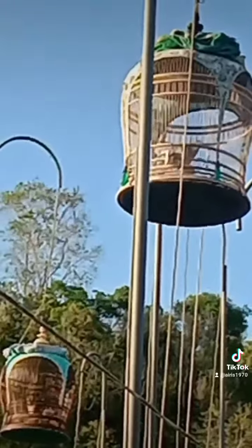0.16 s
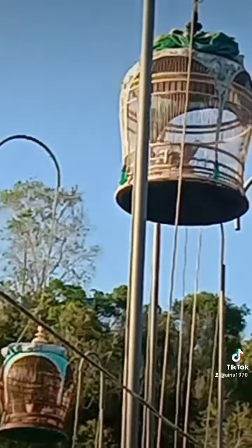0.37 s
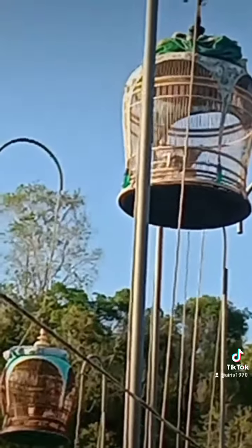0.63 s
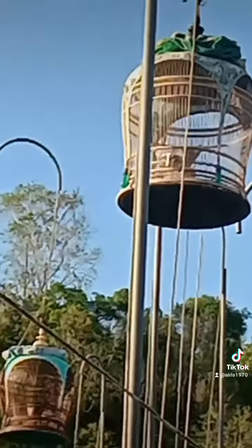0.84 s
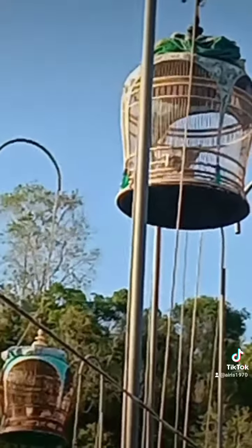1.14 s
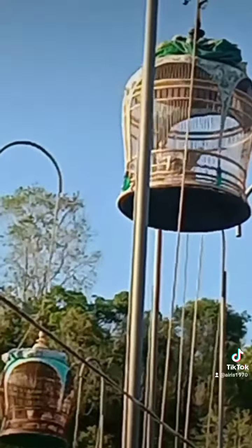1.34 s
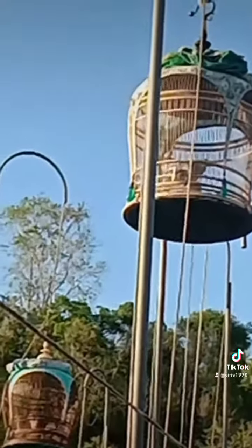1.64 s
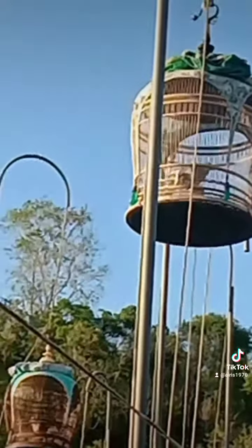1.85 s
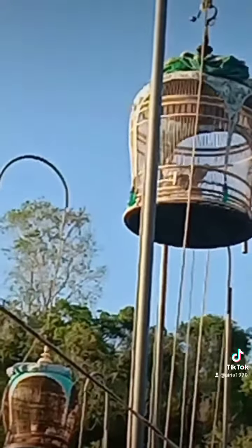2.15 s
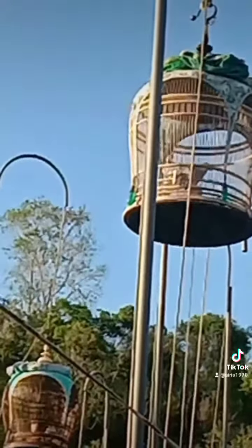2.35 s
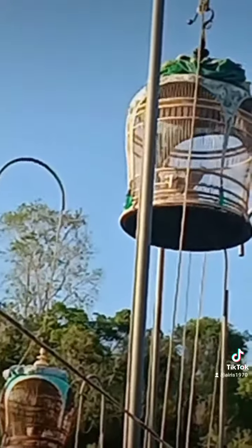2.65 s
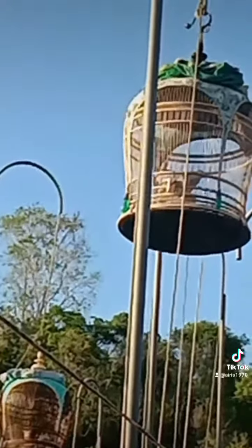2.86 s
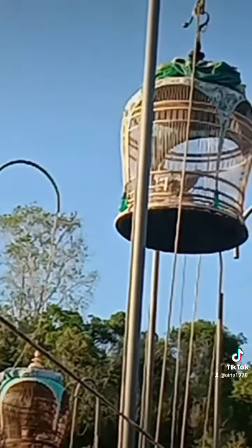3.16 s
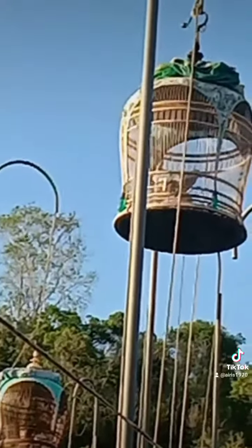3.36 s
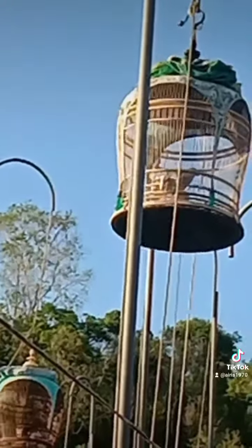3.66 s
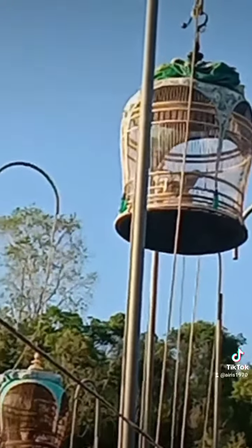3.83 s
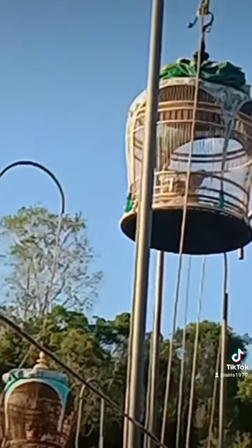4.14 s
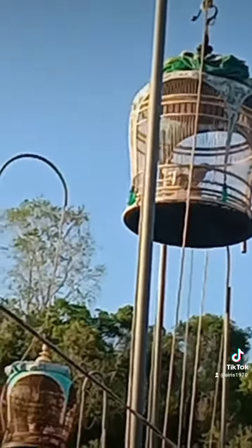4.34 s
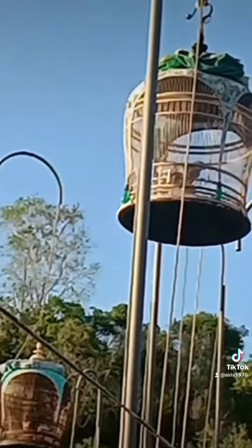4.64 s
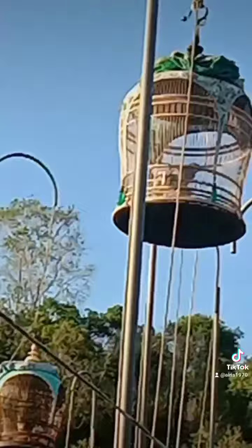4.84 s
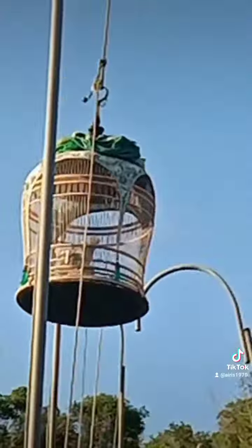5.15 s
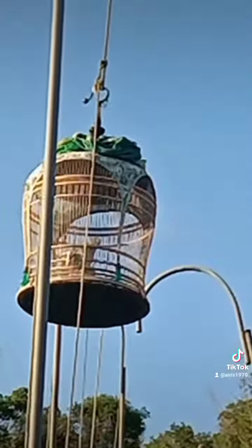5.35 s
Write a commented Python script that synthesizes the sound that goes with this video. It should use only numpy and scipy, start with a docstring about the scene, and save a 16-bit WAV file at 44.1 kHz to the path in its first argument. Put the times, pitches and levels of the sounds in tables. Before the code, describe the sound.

Outdoors, a dove's repeated hoots stretch into one long coo, answered by a sharp rolling dove call, over bird whistles, insects and gritty footsteps.

```python
"""An open yard with caged doves: one coos ever longer notes, a neighbour drones under it, a zebra dove cuts in high.
Small birds whistle, chirp and trill in the trees: near-pure gliding tones, some roughened by noise or a beat.
Four insects buzz as pulsed noise through a resonance; feet scuff the ground close by in hiss, thuds and ticks.
Walls and trees return soft echoes and a diffuse tail; a phone microphone colours the mono sum."""
import sys
import numpy as np
from scipy import signal
from scipy.fft import rfft, irfft
from scipy.io import wavfile
from scipy.ndimage import uniform_filter1d

SR = 44100
rng = np.random.default_rng(int(sys.argv[2]) if len(sys.argv) > 2 else 0)


def to_wav(sig):
    """Store sig (one row per channel, or 1-D mono) as 16-bit WAV at the path in sys.argv[1].

    Samples outside -1..1 are clipped; the rate is SR.
    """
    pcm = np.clip(np.atleast_2d(sig), -1, 1) * 32767
    pcm = np.round(pcm).astype(np.int16)
    wavfile.write(sys.argv[1], SR, pcm.T)  # frames by channels


def attenuation_scalar(level_db):
    """Turn a level in dB into a linear amplitude multiplier (20 dB per decade)."""
    decades = np.asarray(level_db, float) / 20
    return 10 ** decades


N = 242550
T = np.arange(N) / SR


def unit(x):
    """Scale to rms 1."""
    return x / np.sqrt(np.mean(x ** 2))


def walk(rate_hz):
    """Smooth random curve of rms 1 that changes about rate_hz times a second."""
    knots = uniform_filter1d(rng.standard_normal(int(2 * rate_hz * N / SR) + 2), size=2)
    return unit(np.interp(T * 2 * rate_hz, np.arange(len(knots)), knots))


def band(x, hz, width_hz):
    """Second-order Butterworth band-pass."""
    limits = [hz - width_hz / 2, hz + width_hz / 2]
    return signal.sosfilt(signal.butter(2, limits, "bandpass", fs=SR, output="sos"), x)


def noise_band(hz, width_hz):
    """White noise through one band-pass, rms 1."""
    return unit(band(rng.standard_normal(N), hz, width_hz))


def shape(x, spectrum):
    """Filter by (Hz, dB) points joined on a log-frequency axis."""
    f, db = np.transpose(spectrum)
    hz = np.maximum(np.fft.rfftfreq(N, 1 / SR), 1)
    return irfft(rfft(x) * attenuation_scalar(np.interp(np.log(hz), np.log(f), db)), N)


def coloured(spectrum, flicker_db, rate_hz):
    """Noise in quarter-octave bands that flicker independently, weighted by a spectrum, rms 1."""
    noise = rng.standard_normal(N)
    centres = 40 * 2 ** np.arange(0, 8.6, 1 / 4)
    flat = sum(band(noise, c, c / 6) * attenuation_scalar(flicker_db * walk(rate_hz)) for c in centres)
    return unit(shape(flat, spectrum))


def window(start_s, length_s, edge_s, t=T):
    """A gate of the given length with sine-squared edges."""
    inside = np.minimum(t - start_s, start_s + length_s - t)
    return np.sin(np.pi / 2 * np.clip(inside / edge_s, 0, 1)) ** 2


def knock(events, rise_s, t60_s):
    """Envelope of a row of knocks, each rising fast and dying exponentially."""
    t = T[:SR // 4]
    hits = np.zeros(N)
    hits[[int(s * SR) for s, *_ in events]] = attenuation_scalar([db for _, db, *_ in events])
    return signal.fftconvolve(hits, (1 - np.exp(-t / rise_s)) * attenuation_scalar(-60 * t / t60_s))[:N]


def sing(notes, edge_s, wobble_db=0., rate_hz=40., drift_hz=0.):
    """A near-pure syrinx tone along each note's (s, Hz, dB) points, with random wobble and drift."""
    out, drift = np.zeros(N), drift_hz * walk(rate_hz)
    for note in notes:
        s, hz, db = np.transpose(note)
        part = slice(max(int((s[0] - edge_s) * SR), 0), int((s[-1] + edge_s) * SR))
        t = T[part]
        phase = 2 * np.pi * np.cumsum(np.interp(t, s, hz) + drift[part]) / SR
        gate = window(s[0] - edge_s / 2, s[-1] - s[0] + edge_s, edge_s, t)
        out[part] += np.sqrt(2) * attenuation_scalar(np.interp(t, s, db)) * gate * np.sin(phase)
    return out * attenuation_scalar(wobble_db * walk(rate_hz))


def glides(rows):
    """Straight syrinx glides from rows of start s, length s, from Hz, to Hz, level dB."""
    return sing([[(s, a, db), (s + d, b, db - 0.5)] for s, d, a, b, db in rows], 0.0071)


def flutter():
    """Low-frequency noise, rms 1, that roughens a syrinx tone into a rasp."""
    return unit(band(band(rng.standard_normal(N), 170, 320), 170, 320))


def breath():
    """Slight random gain that makes a tone breathy."""
    return 1 + .3 * noise_band(70, 110)


def yard(x, echoes, tail_db, t60_s):
    """Direct sound, distinct (delay s, dB) echoes and a diffuse tail of decaying noise."""
    t = T[:SR // 2]
    response = attenuation_scalar(tail_db) * rng.standard_normal(len(t)) * attenuation_scalar(-60 * t / t60_s) * (t > .012)
    response[0] = 1
    for delay_s, db in echoes:
        response[int(delay_s * SR)] += attenuation_scalar(db)
    return signal.fftconvolve(x, response)[:N]


def strokes(hz, width_hz, rate_hz, share):
    """Wing or membrane strokes, a puff of noise each, through the insect's resonance; rms 1."""
    puffs = np.exp(-((rate_hz * T % 1 - .5) / (share / 2)) ** 2) * rng.standard_normal(N)
    return unit(band(band(puffs, hz, width_hz), hz, width_hz))


def steady_buzzer():
    """Continuous wing strokes heard in two bands."""
    # Each row: centre in Hz, width in Hz, share of the stroke that sounds, mean level in dB.
    bands = [(10570, 1620, 1, -76), (14200, 4100, 0.82, -84)]
    wing_hz = 136.2
    return sum(attenuation_scalar(db + 1.2 * walk(18)) * strokes(hz, w, wing_hz, share) for hz, w, share, db in bands)


def throbbers():
    """Two insects with slow strokes, each throb a swell of narrow-band noise."""
    # Each row: centre in Hz, width in Hz, throbs a second, share that sounds, mean level in dB.
    throbs = [(4870, 260, 29, 0.71, -86), (1153, 64, 7.5, 0.93, -76.5)]
    return sum(attenuation_scalar(db + walk(1.0)) * strokes(hz, w, r, share) for hz, w, r, share, db in throbs)


def cicada():
    """Membrane strokes in phrases that swell by 14 dB and stop short."""
    # Each row: start in seconds, end in seconds, level reached at the end in dB.
    phrases = [(-.4, 0.53, -70.5), (0.924, 1.629, -69.5), (2.05, 2.652, -72.5), (2.993, 3.633, -68),
               (3.202, 3.76, -80), (3.956, 4.656, -70.5), (4.21, 4.923, -80.5), (5.1, 5.25, -80)]
    envelope = sum(attenuation_scalar(db - 14 * (b - T) / (b - a)) * window(a, b - a, 0.027) for a, b, db in phrases)
    return envelope * strokes(7097, 530, 182, 0.72)


def outdoor_air():
    """Coloured noise that swells gently and flickers band by band."""
    # Each row: frequency in Hz, relative level in dB per Hz.
    air_spectrum = [(30, -24.5), (100, -8), (250, -9.5), (500, -16), (900, -17.5), (1300, -7.5),
                    (1700, -19.5), (2800, -14.5), (4000, -18), (5000, -16.5), (6300, -26.5), (7500, -28.5),
                    (9000, -24)]
    mean_db, swell_db, flicker_db = -71.5, 1.3, 1.7
    return attenuation_scalar(mean_db + swell_db * walk(9)) * coloured(air_spectrum, flicker_db, 12.)


def drone():
    """The neighbour's syrinx tone: pitch sinks steadily, each swell rises and dies."""
    # Each row: start in seconds, end in seconds, peak level in dB.
    swells = [(-.03, 0.035, -50.5), (0.038, 0.121, -53.5), (0.13, 0.197, -47.5), (0.263, 0.375, -50),
              (0.424, 0.556, -47), (0.613, 0.864, -49.5), (0.886, 0.983, -45), (1.011, 1.162, -51.5),
              (1.212, 1.531, -52.5)]
    start_hz, slope_hz_per_s = 691, -36.5
    notes = []
    for a, b, db in swells:
        points = (a, db - 2.0), (a + 0.62 * (b - a), db), (b, db - 9.0)
        notes.append([(s, start_hz + slope_hz_per_s * s, level) for s, level in points])
    return sing(notes, 0.005436, 1.8, 30.14, 11)


def scuffs():
    """Grit hisses and crackles under a dragging sole, fading through each scuff."""
    # Each row: start in seconds, time to fall 16 dB in seconds, starting level in dB.
    drags = [(0, 0.048, -62.5), (0.235, 0.13, -55.5), (0.338, 0.14, -52), (0.824, 0.15, -50.5),
             (0.873, 0.15, -49), (1.082, .17, -50), (1.44, 0.12, -54), (1.693, 0.17, -54.5),
             (2.052, 0.17, -53.5), (2.31, 0.13, -60.5), (3.364, 0.15, -61.5), (3.539, 0.085, -65.5),
             (3.901, 0.19, -62), (4.341, 0.087, -64), (4.566, 0.22, -66)]
    # Each row: frequency in Hz, relative level in dB per Hz.
    grit_spectrum = [(25, -54), (70, -27), (220, -22), (450, -21), (900, -17.5), (1300, -20.5), (2500, -19),
                     (4500, -16.5), (6500, -28), (9000, -35.5)]
    grains_per_s, spread_db, crackle_db, grain_t60_s = 700, 3, -5, 0.023
    drag = sum(attenuation_scalar(db - 16 * (T - s) / d) * window(s, 1.06 * d, 0.28 * d) for s, d, db in drags)
    grains = (rng.random(N) < grains_per_s / SR) * rng.standard_normal(N)
    grains *= attenuation_scalar(spread_db * np.minimum(rng.exponential(size=N), 4))
    ring = rng.standard_normal(SR // 50) * attenuation_scalar(-60 * T[:SR // 50] / grain_t60_s)
    grains = signal.fftconvolve(grains, ring)[:N]
    pink = [(hz, db - 10 * np.log10(hz)) for hz, db in grit_spectrum]  # 3 dB an octave darker
    hiss = coloured(grit_spectrum, 2.93, 40.) * attenuation_scalar(2.0 * walk(110))
    return drag * (hiss + attenuation_scalar(crackle_db) * unit(shape(grains, pink)))


def thuds():
    """Dull ground thuds of the steps: short noise bursts through the pitch of each blow."""
    # Each row: time in seconds, level before the final band-pass in dB, pitch in Hz.
    blows = [(.005, -47, 770), (0.368, -45.5, 743), (0.838, -52, 252), (0.892, -49, 234), (0.995, -56, 175),
             (1.103, -48.5, 125), (1.451, -55, 240), (1.729, -63.5, 208), (1.835, -63.5, 208),
             (2.057, -48.5, 197), (3.135, -63.5, 246), (3.912, -68.5, 198), (4.348, -63.5, 234),
             (4.584, -58, 250), (4.584, -55.5, 463), (4.716, -56, 242)]
    out = np.zeros(N)
    for s, db, hz in blows:
        burst = noise_band(hz, 0.48 * hz) * knock([(s, db)], 0.00057, 0.2)
        out += band(burst, 1.79 * hz, 2.45 * hz)
    return out


def whistler():
    """One bird's wavering syrinx whistles: rising notes, and level notes flicked down at the end."""
    # Each row: start in seconds, end of rise in seconds, starting pitch in Hz, peak level in dB.
    rising = [(0.192, 0.379, 2865, -54), (3.85, 4.005, 2784, -54.5), (5.324, 5.51, 2826, -57.5)]
    # Each row: start in seconds, end in seconds, level ahead of the flick in dB.
    level_notes = [(0.044, 0.105, -72.5), (0.512, 0.724, -59.5), (4.145, 4.363, -68), (5.148, 5.204, -76.5)]
    top_hz, swell_db, linger_s, linger_db = 3240, 13.5, 0.19, 23.5
    held_hz, flick_hz_per_s, flick_s = 2770, 980, 0.036  # the longer the note, the deeper its flick
    notes = []
    for a, b, hz, db in rising:
        notes.append([(a, hz, db - swell_db), (b, top_hz, db), (b + 0.065, top_hz, db - 0.78 * linger_db),
                      (b + linger_s, top_hz - 25, db - linger_db)])
    for a, b, db in level_notes:
        notes.append([(a, held_hz, db - 7), (a + 0.34 * (b - a), held_hz - 25, db - 3.5),
                      (b - flick_s, held_hz + 15, db), (b, held_hz - flick_hz_per_s * (b - a), db + 1.0)])
    return sing(notes, .015, 2.0, 45., 14) * breath()


def coo(a, b, hz, db):
    """Scoop up to the pitch, swell, break off and sag as the breath runs out."""
    scoop_s, scoop_hz, scoop_db = 0.017, 86, 14.5
    sag_s, sag_hz, sag_db = .02, 52, 14
    return [(a, hz - scoop_hz, db - scoop_db), (a + scoop_s, hz - 30, db - 10.0),
            (a + min(.05, 0.7 * (b - a)), hz - 6, db - 5), (b - .012, hz, db), (b - .003, hz - 6, db - 4.5),
            (b + 0.0023, hz - 25, db - 8.5), (b + sag_s, hz - sag_hz, db - sag_db)]


def near_dove():
    """Syrinx coos; the throat clucks as each short one opens, fainter along the series."""
    # Each row: start in seconds, break-off in seconds, top pitch in Hz, peak level in dB.
    coos = [(0.214, 0.265, 766, -40), (0.406, 0.455, 758, -39.5), (0.604, 0.658, 763, -40),
            (0.793, 0.853, 774.5, -39), (0.994, 1.06, 767.5, -38.5), (1.197, 1.273, 768.5, -38),
            (1.418, 1.497, 767.4, -39), (1.646, 1.77, 766.5, -38.5), (1.92, 2.08, 756, -39),
            (2.259, 2.404, 753.6, -41.5)]
    # One note; each row: time in seconds, pitch in Hz, level in dB.
    long_coo = [
        [(2.579, 710, -55), (2.61, 734, -48.5), (2.72, 736, -44.5), (3.0, 707.3, -44), (3.25, 691, -45.5),
         (3.42, 703, -49.5), (3.51, 741, -57.5), (3.53, 792, -52.5)],
    ]
    cluck_hz, cluck_db, cluck_db_per_s = 1260, -54, -5
    clucks = []
    for a, *_ in coos:
        db = cluck_db + cluck_db_per_s * a
        clucks.append([(a - .002, cluck_hz - 11, db + 0.5), (a + 0.022, cluck_hz + 11, db)])
    return sing([coo(*c) for c in coos] + long_coo, 0.00593) + sing(clucks, 0.017, 5.7, 150., 30.0)


def ticks():
    """Twigs tick: short noise bursts, each opening with a bright snap."""
    # Each row: time in seconds, level in dB, centre in Hz.
    snaps = [(0.2912, -49, 4670), (0.3716, -49, 1650), (0.843, -41, 6500), (0.896, -40, 3350),
             (0.9263, -43.5, 3740), (1.1006, -45.5, 2600), (1.4619, -38.5, 5000), (1.514, -55, 5300),
             (1.549, -57, 5700), (2.118, -55, 4600), (2.328, -58, 3170), (2.403, -56, 3100),
             (3.5383, -38.5, 6400), (4.351, -60, 5340), (4.591, -55, 3700), (4.717, -62, 1610)]
    noise = rng.standard_normal(N)
    body = sum(unit(band(noise, hz, 3100)) * knock([(s, db)], 0.0006, 0.025) for s, db, hz in snaps)
    return body + attenuation_scalar(-11.5) * unit(band(noise, 9150, 8000)) * knock(snaps, 0.00083, 0.011)


def trill():
    """A slow row of short rising syrinx pips that swells by 4 dB."""
    # Each row: first pip in seconds, end in seconds, level reached at the end in dB.
    rows = [(0.46, .85, -61.5), (1.376, 1.81, -61.5), (2.322, 2.73, -62.5), (4.667, 5.038, -71)]
    pips_per_s = 25.4
    pips = []
    for a, b, db in rows:
        for s in np.arange(a, b, 1 / pips_per_s):
            level = db - 4 * (b - s) / (b - a)
            pips.append([(s, 2440, level + 0.5), (s + 0.011, 2580, level)])
    return sing(pips, 0.008, 1.6, 25., 18)


def buzzing_notes():
    """A close bird's fluttering syrinx: a steady beat and some chance make the buzz."""
    # Each row: start in seconds, length in seconds, from Hz, to Hz, level before the beat in dB.
    buzzes = [(1.104, 0.059, 5750, 5750, -45), (1.168, 0.05, 5720, 5850, -54),
              (1.128, 0.066, 6630, 6650, -54)]
    beat_hz = 131
    return glides(buzzes) * (.75 + .45 * np.cos(2 * np.pi * beat_hz * T) + .45 * flutter())


def tumbling_call():
    """One bird's call falls through four glides, each rasped by chance, with a short tail of its own."""
    # Each row: start from the call time in seconds, length in seconds, from Hz, to Hz,
    # relative level before the rasp in dB, rasp depth.
    falls = [(-.037, 0.017, 6050, 5850, 0.5, .25), (-.002, .012, 5950, 5500, -2.5, .4),
             (.01, .02, 5150, 4750, -6, 3), (0.036, .018, 3650, 3400, -11, 2.5)]
    # Each row: call time in seconds, level before the rasp in dB.
    calls = [(1.242, -56.5), (2.039, -57), (3.02, -58.5)]
    chance = flutter()
    out = np.zeros(N)
    for dt, d, a, b, rel, rough in falls:
        notes = [[(s + dt, a, db + rel), (s + dt + d, b, db + rel)] for s, db in calls]
        out += sing(notes, 0.0078) * (1 + rough * chance)
    return yard(out, [], -32, 0.11)


def chirps():
    """Short syrinx glides that chance spreads into a rasp."""
    # Each row: start in seconds, length in seconds, from Hz, to Hz, level before the rasp in dB.
    rows = [(1.308, 0.026, 2970, 2890, -62.5), (2.191, 0.0097, 3440, 3400, -58),
            (2.221, 0.011, 2990, 3050, -61), (3.443, 0.04, 2750, 3240, -60),
            (3.669, 0.035, 3190, 2960, -66), (3.873, 0.018, 2930, 3300, -62.5),
            (3.965, 0.025, 2390, 2460, -61.5), (4.5, 0.012, 3900, 3250, -69.5),
            (4.528, 0.019, 2950, 2940, -83), (5.12, 0.026, 3310, 2970, -66),
            (5.329, 0.032, 2540, 2430, -68.5)]
    return glides(rows) * (.8 + .5 * flutter())


def drawls():
    """Drawn-out far calls arrive by many paths and blur into a narrow hiss."""
    # Each row: start in seconds, length in seconds, from Hz, to Hz, level before the blur in dB.
    rows = [(1.347, 0.048, 3780, 4070, -62), (1.385, 0.032, 4300, 4470, -66), (1.578, .13, 3790, 4150, -67),
            (1.626, 0.098, 3170, 3320, -67.5), (1.913, 0.15, 4000, 3850, -66.5),
            (1.87, 0.25, 3150, 3240, -68.5), (2.063, 0.029, 3450, 3770, -69),
            (2.272, 0.14, 3960, 4090, -72.5), (2.918, 0.038, 3430, 3570, -76),
            (2.975, .075, 3850, 4130, -74), (4.315, .15, 4000, 4000, -89)]
    return glides(rows) * (.3 + .65 * noise_band(75, 140)) * breath()


def zebra_dove():
    """A throbbing syrinx note, then arched notes; a fluttering climb leads into each."""
    # First note; each row: start in seconds, length in seconds, pitch in Hz, level in dB.
    pulses = [(2.643, 0.0041, 1244, -31), (2.674, 0.013, 1263, -31.5), (2.715, 0.0024, 1286, -31.5),
              (2.733, 0.005, 1216, -29.5), (2.765, 0.0025, 1233, -33.5), (2.785, 0.019, 1209, -33)]
    # Plain notes; each row: start in seconds, end in seconds, top pitch in Hz, peak level in dB.
    plain = [(2.842, 2.876, 1212, -35), (2.915, 2.945, 1192, -42), (3.005, 3.04, 1206, -36.5),
             (3.122, 3.273, 1230, -32.5)]
    dip_db, dip_hz = 10, 35.6  # between pulses the level dips and the pitch slips up
    rise_hz, fall_hz, fade_db = 45, 126, 14.5
    roll_s, roll_db, roll_from_hz, roll_to_hz = .022, -42.5, 920, 1183
    roll_hz, roll_depth, roll_scatter_db = 105, .65, 2.5
    first_s, _, first_hz, first_db = pulses[0]
    throb = [(first_s - .008, first_hz - 25, first_db - dip_db)]
    for (s, d, hz, db), (after, *_) in zip(pulses, pulses[1:] + [(pulses[-1][0] + 0.044,)]):
        throb += [(s, hz, db), (s + d, hz, db - .6), ((s + d + after) / 2, hz + dip_hz, db - dip_db)]
    notes = [throb]
    for a, b, hz, db in plain:
        d = b - a
        notes.append([(a, hz - rise_hz, db - 5.5), (a + 0.011, hz - 15, db), (a + 0.29 * d, hz, db - 1.0),
                      (a + .65 * d, hz - 0.32 * fall_hz, db - 5.5),
                      (a + .75 * d, hz - 0.71 * fall_hz, db - 0.82 * fade_db), (b, hz - fall_hz, db - fade_db)])
    climbs = [[(n[0][0] - roll_s, roll_from_hz, roll_db - 3.5), (n[0][0] + 0.0022, roll_to_hz, roll_db)]
              for n in notes]
    rolls = sing(climbs, 0.00526) * (1 + roll_depth * np.cos(2 * np.pi * roll_hz * T))
    return sing(notes, .006) + rolls * attenuation_scalar(roll_scatter_db * walk(150))


def far_dove():
    """Distant syrinx calls arrive by many paths and waver."""
    # Each row: start in seconds, end in seconds, starting pitch in Hz, starting level in dB.
    calls = [(3.967, 4.03, 612, -80), (4.008, 4.204, 615, -73.5), (4.232, 4.274, 580, -84),
             (4.441, 4.483, 605, -78.5), (4.654, 4.7, 600, -72), (4.901, 5.125, 590, -78.5)]
    return sing([[(a, hz, db), (b, hz - 6, db - 2.5)] for a, b, hz, db in calls], 0.00735, 1.2, 45)


def whoop():
    """A low syrinx call rising at the close."""
    # One note; each row: time in seconds, pitch in Hz, level in dB.
    rise = [
        [(5.46, 467, -66), (5.48, 530, -61), (5.5, 827, -51)],
    ]
    return sing(rise, 0.0036, 3.0, 220)


def background():
    """Insects and air, sinking together when the doves stop."""
    # Each row: time in seconds, gain in dB.
    swell = [(0.0, 3.5), (3.55, 2.5), (3.61, -2.5), (5.42, -3.5), (5.5, 1)]
    s, db = np.transpose(swell)
    return (steady_buzzer() + throbbers() + cicada() + outdoor_air()) * attenuation_scalar(np.interp(T, s, db))


def scene():
    """Birds through the yard's echoes, over steps, insects, outdoor air and a faint even hiss."""
    # Each row: delay in seconds, level in dB.
    echo_list = [(.045, -19), (.11, -33)]
    near = yard(near_dove() + zebra_dove(), echo_list, -49.5, 0.37)
    far = yard(drone() + far_dove() + whoop(), [], -29.5, 0.31)
    small_birds = whistler() + trill() + buzzing_notes() + tumbling_call() + chirps() + drawls()
    trees = yard(small_birds, [], -34.0, 0.36)
    steps = scuffs() + thuds() + ticks()
    hiss = attenuation_scalar(-93.0) * rng.standard_normal(N)
    return (near + far + trees + steps + background() + hiss)[None]


def low_pass(x):
    """Removes everything above the highest recorded frequency."""
    return signal.sosfilt(signal.butter(12, 16320, fs=SR, output="sos"), x)


def record(dry):
    """The microphone port dips and rolls off in the treble."""
    # Each row: frequency in Hz, gain in dB.
    mic_response = [(30, -2.5), (100, 1.5), (7500, 1.5), (8300, -12.5), (9400, 0), (10600, 3.5),
                    (11200, -7.5), (12200, -17.5)]
    mix = shape(dry[0], mic_response)[None]
    return low_pass(mix)


dry = scene()
out = record(dry)
to_wav(out)
```